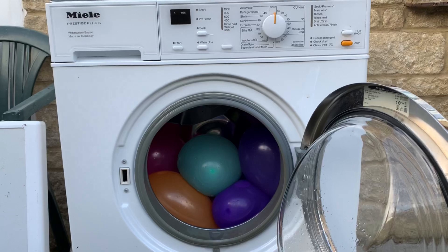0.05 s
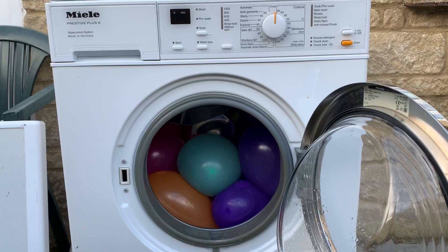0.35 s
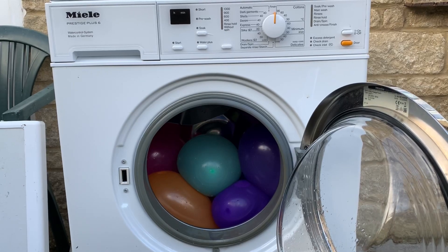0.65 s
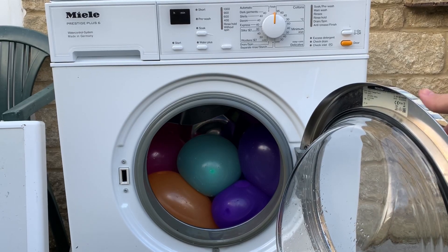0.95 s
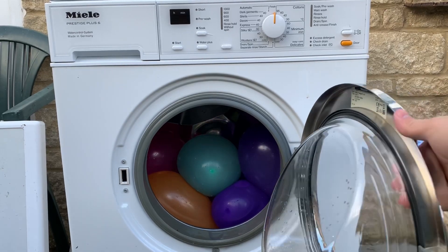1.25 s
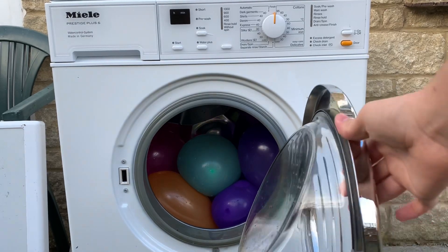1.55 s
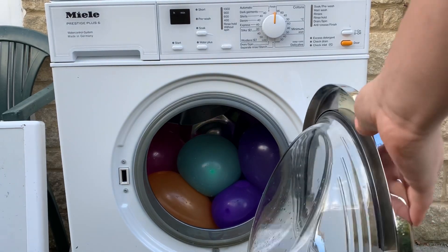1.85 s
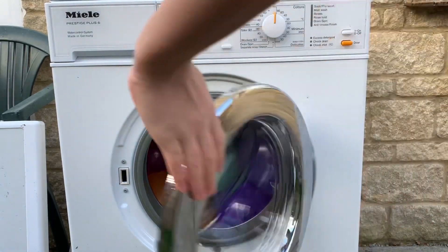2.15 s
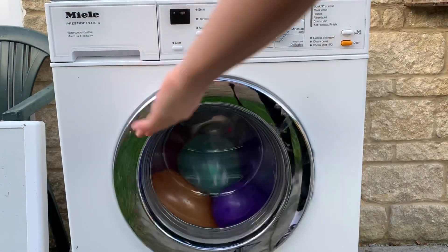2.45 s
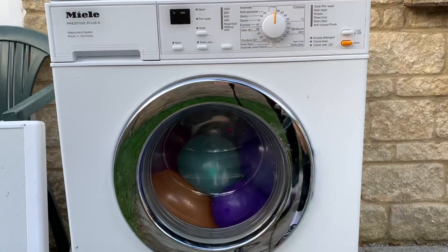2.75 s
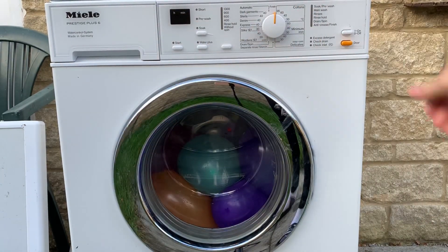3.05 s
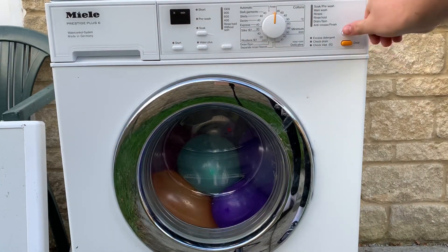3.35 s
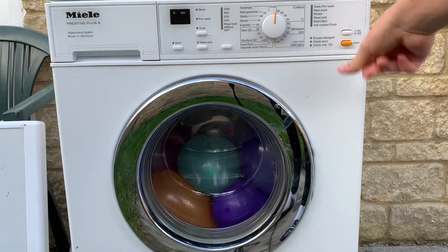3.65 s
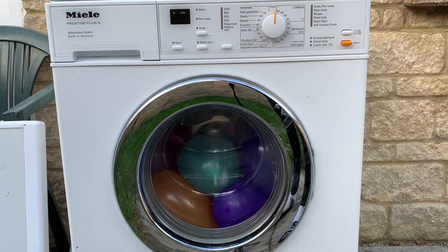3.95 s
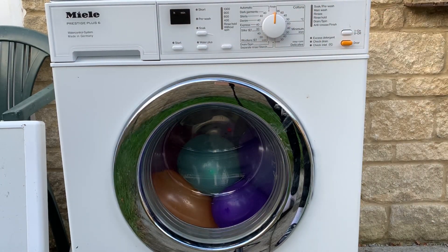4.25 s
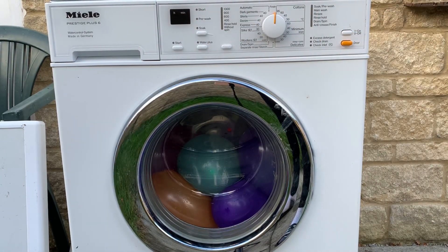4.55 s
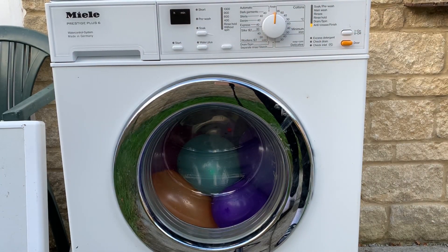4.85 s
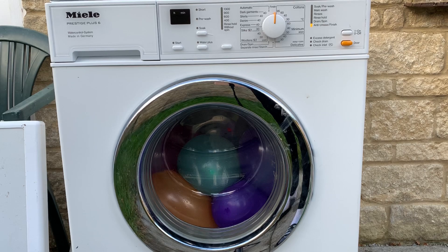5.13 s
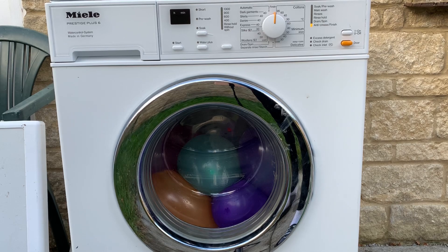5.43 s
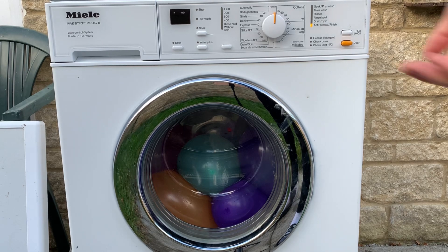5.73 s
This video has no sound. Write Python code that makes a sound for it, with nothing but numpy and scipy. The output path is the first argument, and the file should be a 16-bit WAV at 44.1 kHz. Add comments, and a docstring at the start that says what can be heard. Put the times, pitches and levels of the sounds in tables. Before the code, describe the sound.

Over a soft wind rumble, a washer's glass door bangs closed and latches, then a button clicks in and out.

```python
"""Washing machine door slammed in a yard.

The glass door swings and slams close by: it thumps into the seal, the latch snaps and rattles,
the steel cabinet rings and the tub booms on its springs. The lock ticks home, then a button
is pressed and released. Light wind, soft rustles and far traffic lie underneath."""
import sys
import numpy as np
from scipy import signal
from scipy.fft import rfft, irfft, next_fast_len
from scipy.io import wavfile
from scipy.ndimage import map_coordinates

SR = 44100
rng = np.random.default_rng(int(sys.argv[2]) if len(sys.argv) > 2 else 0)


def transcribe(u):
    """Save the signal u as a 16-bit wav file named by the first command-line argument.

    u: samples, shape (n,) or (channels, n), limited to [-1, 1]; the rate is SR.
    q: integer samples, one column per channel.
    """
    v = np.clip(np.atleast_2d(u).T, -1, 1)
    q = np.round(v * 32767).astype(np.int16)
    wavfile.write(sys.argv[1], SR, q)


N = 259749


def amp(db):
    """Decibels to gain."""
    return 10 ** (np.asarray(db) / 20)


def unit(x):
    """Scale to rms 1."""
    return x / np.sqrt(np.mean(x ** 2) + 1e-20)


def along(points, hz):
    """Interpolate (Hz, value) points on a log frequency axis."""
    knots_hz, values = np.transpose(points)
    return np.interp(np.log(hz + 1), np.log(knots_hz + 1), values)


def timeline(points):
    """Interpolate (seconds, value) points at every sample."""
    knots_s, values = np.transpose(points)
    return np.interp(np.arange(N) / SR, knots_s, values)


def wobble(rate_hz):
    """Smooth random curve, rate_hz knots a second."""
    knots = rng.standard_normal(int(N * rate_hz / SR) + 4)
    return map_coordinates(knots, [np.arange(N) * rate_hz / SR])


def fade(t, t60_s):
    """Decay of 60 dB in t60_s."""
    return np.exp(-np.log(1000) * t / t60_s)


def bell(centre_s, half_s):
    """Start time and gains of a Gaussian swell of height 1."""
    start_s = max(centre_s - 3 * half_s, 0)
    t = start_s + np.arange(round((centre_s + 3 * half_s - start_s) * SR)) / SR
    return start_s, np.exp(-((t - centre_s) / half_s) ** 2)


def filtered(x, response):
    """Apply a complex frequency response."""
    size = x.shape[-1]
    padded = next_fast_len(size + SR // 4)
    hz = np.fft.rfftfreq(padded, 1 / SR)
    return irfft(rfft(x, padded) * response(hz), padded)[..., :size]


def noise(spectrum, width, size=N):
    """Stereo noise of rms 1; spectrum and side-to-mid width are (Hz, dB) points."""
    def gains(hz):
        return amp(along(spectrum, hz)) * [np.ones_like(hz), amp(along(width, hz))]
    mid, side = filtered(rng.standard_normal((2, size)), gains)
    return unit(np.array([mid + side, mid - side]))


def dying(x, t60_points):
    """Decay each frequency at its own rate, from (Hz, t60 in seconds) points."""
    hz, t, bands = signal.stft(x, SR, nperseg=128)
    decay = fade(t, along(t60_points, hz)[:, None])
    return signal.istft(bands * decay, SR)[1][:, :x.shape[-1]]


def add(track, start_s, sound):
    """Mix a sound into the track."""
    start = round(start_s * SR)
    track[..., start:start + sound.shape[-1]] += sound[..., :N - start]


def swells(rows, relative_width):
    """Brief swells of noise, each in one narrow resonance."""
    out = np.zeros((2, N))
    for centre_s, half_s, hz, db in rows:
        start_s, swell = bell(centre_s, half_s)
        white = rng.standard_normal((2, SR))
        tone = unit(filtered(white, lambda f: 1 / (1 + ((f / hz - 1) / relative_width) ** 2)))
        add(out, start_s, amp(db) * swell[:SR] * tone[:, :len(swell)])
    return out


# Noise floor spectrum. Each row: frequency in Hz, relative density in dB.
FLOOR_SPECTRUM = [(30, 44.5), (60, 57), (100, 40.5), (170, 34), (250, 16), (2000, 3.5), (6000, -1),
                  (8300, 0), (10800, -1), (15500, -8)]


def noise_floor(level_db=-54):
    """The microphone's steady, low noise."""
    return amp(level_db) * noise(FLOOR_SPECTRUM, [(60, -13.5), (1000, 0)])


# Stereo width of the open air. Each row: frequency in Hz, side against mid in dB.
AIR_STEREO = [(60, -5), (110, -8.5), (200, -7), (380, -2), (700, 2), (1290, 2), (2380, -0.5), (4400, -0.5),
              (8120, 0), (15000, -5)]
# Traffic loudness. Each row: time in seconds, relative level in dB.
TRAFFIC_LEVELS = [(0.0, -53.5), (0.74, -53.5), (1.26, -57), (2.03, -57), (2.38, -49), (2.9, -56.5),
                  (5.89, -57)]
# Far traffic spectrum. Each row: frequency in Hz, relative density in dB.
TRAFFIC_SPECTRUM = [(59, -30.5), (100, -1.5), (185, -7), (203, -8.5), (230, -8), (252, -11), (286, -7),
                    (377, -14), (427, -15), (483, -16), (590, -17), (982, -18), (1400, -23), (1750, -32),
                    (2230, -39), (4000, -45.5), (5200, -70), (8800, -120)]


def traffic(gain_db=2, waver_db=0.5):
    """Traffic hums far away."""
    level_db = timeline(TRAFFIC_LEVELS) + gain_db + waver_db * wobble(6.1)
    return amp(level_db) * noise(TRAFFIC_SPECTRUM, AIR_STEREO)


# Distant chirps. Each row: centre in seconds, half length in seconds, pitch in Hz, level in dB.
FAR_CHIRPS = [(0.14, 0.036, 5340, -71.5), (1.1, 0.085, 6580, -76), (5.84, 0.046, 6590, -76)]


def chirps():
    """Faint, thin chirps from far off."""
    return swells(FAR_CHIRPS, relative_width=0.024)


# Wind strength. Each row: time in seconds, relative level in dB.
WIND_LEVELS = [(0, -46), (.45, -43), (.62, -38), (.85, -37.5), (1.15, -34), (1.38, -36), (1.52, -41.5),
               (1.7, -43.5), (1.9, -49.5), (2.15, -41.5), (2.7, -45.5), (3.05, -49), (3.7, -48),
               (4.3, -52.5), (5.89, -52)]
# Buffeting spectrum. Each row: frequency in Hz, relative density in dB.
WIND_SPECTRUM = [(12, -46), (20, -22), (47, 1), (74, -1), (120, -5), (232, -23), (258, -28), (296, -22.5),
                 (431, -46), (500, -46.5), (650, -70.5), (1100, -120)]


def wind(gain_db=-1, gust_db=2):
    """Wind buffets the microphone with an uneven rumble."""
    level_db = timeline(WIND_LEVELS) + gain_db + gust_db * wobble(14)
    return amp(level_db) * noise(WIND_SPECTRUM, [(60, -10.5), (300, -13)])


# Puffs of wind. Each row: centre in seconds, half length in seconds, pitch in Hz, level in dB.
EDDIES = [(0.273, 0.017, 79, -33), (0.525, 0.021, 75.1, -32.5), (0.627, 0.016, 95, -29),
          (0.705, 0.055, 75, -32.5), (0.958, 0.024, 75, -30), (1.022, .025, 80, -32.5),
          (1.128, 0.016, 78.43, -26.5), (1.303, 0.018, 130.2, -32.5), (1.445, 0.029, 70.3, -29.5),
          (1.628, 0.011, 64.9, -36.5), (2.952, 0.024, 60, -33.5)]


def puffs(waver=0.12, octave_db=-14):
    """Each eddy shakes the microphone for a few uneven, low cycles, with a weaker octave above."""
    out = np.zeros(N)
    clock_s = np.cumsum(1 + waver * wobble(60)) / SR
    for centre_s, half_s, hz, db in EDDIES:
        start_s, swell = bell(centre_s, half_s)
        phase = 2 * np.pi * hz * clock_s[round(start_s * SR):][:len(swell)]
        shake = np.sin(phase) + amp(octave_db) * np.sin(2 * phase)
        add(out, start_s, np.sqrt(2) * amp(db) * swell * shake)
    return out


# Scuffs. Each row: centre in seconds, half length in seconds, rub in dB, relative hiss in dB.
RUSTLE_STROKES = [(0.157, 0.27, -67.5, -79.5), (0.326, 0.087, -73, -74), (.63, 0.17, -67, -101),
                  (.83, 0.065, -60, -68), (0.918, 0.062, -63.5, -77.5), (1.116, 0.11, -63.5, -77.5),
                  (1.408, 0.084, -68.5, -73.5), (1.48, 0.017, -65, -58), (1.587, 0.12, -67, -65.5),
                  (1.792, 0.018, -67, -66), (1.838, 0.06, -65, -77), (2.07, 0.065, -60, -79),
                  (2.154, 0.042, -52.5, -63.5), (2.215, 0.078, -59, -62), (2.566, 0.028, -75, -73),
                  (2.81, 0.15, -73.5, -76), (4.156, 0.047, -75, -74.5), (4.52, 0.21, -76.5, -79.5),
                  (4.812, 0.09, -68, -74), (5.086, 0.2, -71, -77.5), (5.502, .1, -72.5, -81),
                  (5.841, 0.052, -73, -83.5)]
# Rub and hiss spectra. Each row: frequency in Hz, relative density in dB.
RUB_SPECTRUM = [(900, -24.5), (1700, 2.5), (2800, -0.5), (4200, -5), (6500, -23.5)]
HISS_SPECTRUM = [(2500, -20), (4200, 3), (6200, 2.5), (8200, -3.5), (10800, -6.5), (13000, -11),
                 (15500, -12)]


def rustles(hiss_gain_db=3, grain_db=1.37):
    """Soft strokes of dull rub and bright hiss, loudest as the arm swings the door."""
    rub_power, hiss_power = np.zeros((2, N))
    for centre_s, half_s, rub_db, hiss_db in RUSTLE_STROKES:
        start_s, stroke = bell(centre_s, half_s)
        add(rub_power, start_s, (amp(rub_db) * stroke) ** 2)
        add(hiss_power, start_s, (amp(hiss_db + hiss_gain_db) * stroke) ** 2)
    grain = amp(grain_db * wobble(45))
    rub = np.sqrt(rub_power) * noise(RUB_SPECTRUM, AIR_STEREO)
    hiss = np.sqrt(hiss_power) * noise(HISS_SPECTRUM, AIR_STEREO)
    return grain * (rub + hiss)


# Yard reverberation. Each row: frequency in Hz, t60 in seconds.
YARD_DECAY = [(100, .6), (500, 0.29), (2000, 0.37), (6000, 0.18), (9000, 0.24), (15000, 0.11)]


def yard(x, wet_db=-17, build_s=0.0073):
    """Stone walls return a thin, diffuse tail."""
    t = np.arange(SR * 2 // 3) / SR
    tail = dying(rng.standard_normal((2, len(t))), YARD_DECAY) * (1 - np.exp(-t / build_s)) ** 2
    tail /= np.linalg.norm(tail[0])
    return amp(wet_db) * signal.fftconvolve(x, tail, axes=1)[:, :N]


def paving_bounce(x, delay_s=0.0027, share=0.077):
    """A quick reflection from the paving adds a hollow colour."""
    return filtered(x, lambda hz: 1 + share * np.exp(-2j * np.pi * hz * delay_s)) / np.hypot(1, share)


# Hinge creaks. Each row: centre in seconds, half length in seconds, pitch in Hz, level in dB.
HINGE_CREAKS = [(1.1, 0.063, 1650, -61.5), (2.066, .05, 2852, -64)]


def hinge():
    """The hinge rubs as the door swings."""
    return swells(HINGE_CREAKS, relative_width=0.05)


# Stereo width of the machine. Each row: frequency in Hz, side against mid in dB.
MACHINE_STEREO = [(60, -16), (110, -14), (200, -12), (380, -6), (700, -7), (1290, -7), (2380, -3),
                  (4400, 0), (8120, 0), (15000, -1)]


def modes(rows, t):
    """Decaying (Hz, dB, t60 in seconds) modes; higher ones reach left and right further out of step."""
    out = np.zeros((2, len(t)))
    for hz, db, t60_s in rows:
        lead = rng.choice([-1, 1]) * np.arctan(amp(along(MACHINE_STEREO, hz)))
        phase = rng.uniform(0, 2 * np.pi) + np.array([[lead], [-lead]])
        out += amp(db) * np.sin(2 * np.pi * hz * t + phase) * fade(t, t60_s)
    return out


# Small contacts. Each row: start in seconds, level in dB, then relative body, snap and ring in dB.
SMALL_TICKS = [(1.473, -52, 1, -25, -7), (2.7128, -35.5, 1.5, -28, -24), (2.7151, -45, -3, -22, -19),
               (2.7346, -56, 0, -23, -13), (3.3168, -58, 2, -32, -2.5), (3.9543, -57.5, -6, -5.5, -17),
               (5.1958, -50.5, -13, -20, -18)]


def ticks(tick_t60_s=0.0093, ring_t60_s=0.42):
    """Lock and fingertip make small, dry ticks, pitched near 2 kHz."""
    out = np.zeros((2, N))
    t = np.arange(SR // 4) / SR
    for start_s, db, body_db, snap_db, ring_db in SMALL_TICKS:
        colour = [(500, -16), (1200, -15), (1650, body_db), (2800, body_db - 10), (3400, -18),
                  (5800, -16), (10000, snap_db), (15500, snap_db + 0.5)]
        envelope = fade(t, tick_t60_s) + amp(ring_db) * fade(t, ring_t60_s)
        add(out, start_s, amp(db) * noise(colour, MACHINE_STEREO, len(t)) * envelope)
    return out


# Plastic fascia resonances. Each row: frequency in Hz, bandwidth in Hz, relative level in dB.
FASCIA_MODES = [(570, 25, -6), (1498, 48, -2.5), (1644, 60, -2.5), (2294, 50, -3), (4680, 60, -20),
                (6100, 39, -19), (6570, 87, -9), (11100, 38, -25)]
# Button pushed, bottoming, released.
# Each row: start in seconds, then relative level, body, snap, top treble and ring in dB.
BUTTON_CLICKS = [(3.3341, -39, -6, -8, -34, -13), (3.3445, -40, 8, -34, -45, -4.5),
                 (3.3523, -39.5, 1.5, -35, -45, -6), (3.525, -29.5, -4.5, -9.5, -5.5, -6.5)]


def button(gain_db=-4, tick_t60_s=0.01, ring_t60_s=0.112, plastic_db=-6):
    """The button's spring snaps; the plastic fascia and the hollow behind it ring briefly."""
    out = np.zeros((2, N))
    t = np.arange(SR // 4) / SR
    fascia = [(hz, db, np.log(1000) / (np.pi * width_hz)) for hz, width_hz, db in FASCIA_MODES]
    hollow_decay = [(500, 2.5 * ring_t60_s), (2500, ring_t60_s), (6000, 0.725 * ring_t60_s)]
    for start_s, db, body_db, snap_db, top_db, ring_db in BUTTON_CLICKS:
        colour = [(140, body_db - 6), (300, body_db), (600, body_db + 6), (1100, body_db + 4),
                  (1500, -2.5), (2200, -1), (3200, -8), (4200, -7.5), (6000, -23.5),
                  (10500, snap_db), (15500, top_db)]
        tick = noise(colour, MACHINE_STEREO, len(t)) * fade(t, tick_t60_s)
        hollow = amp(ring_db) * dying(noise(colour, MACHINE_STEREO, len(t)), hollow_decay)
        plastic = amp(plastic_db) * modes(fascia, t)
        add(out, start_s, amp(db + gain_db) * (tick + hollow + plastic))
    return out


# Steel cabinet and glass bowl. Each row: frequency in Hz, relative level in dB, t60 in seconds.
CABINET_MODES = [(184.4, -13, 2.1), (302, -14.5, 0.53), (349.7, -3, 0.31), (540, -18, 0.41),
                 (658, -18, 1.3), (710, -10.5, 0.26), (750, -12, 0.32), (753, -10.5, 0.67),
                 (931, -13.5, 0.3), (1021, 2.5, 0.18), (1080, -12, 0.21), (1190, -15.5, 0.4),
                 (1400, -11, 0.22), (1425, -13, 0.45), (1620, -22.5, 0.4), (1710, -13, 0.2),
                 (2020, -34, 0.49), (2153, -8.5, 0.35), (2320, -26, 0.33), (2200, -13.5, 0.22),
                 (2492, -16.5, 0.27), (3130, -12, 0.18)]
# Steel latch and trim ring. Each row: frequency in Hz, relative level in dB, free t60 in seconds.
LATCH_MODES = [(3700, -10, 0.57), (3800, 0.5, 0.35), (4708, -7, 0.5), (6026, 0.5, 0.28), (6708, -15, 0.51),
               (9356, -3, 0.15), (9600, -5, 0.44), (10300, -5, 0.46), (11000, -10.5, 0.34),
               (12770, -10.5, 0.12)]


def cabinet(start_s=2.245, steel_db=-28, latch_db=-32, attack_s=0.004, catch_t60_s=0.25):
    """Sheet steel rings on after the blow; the closed catch damps latch and trim ring."""
    out = np.zeros((2, N))
    t = np.arange(SR) / SR
    steel = amp(steel_db) * modes(CABINET_MODES, t)
    latch = amp(latch_db) * modes(LATCH_MODES, t) * fade(t, catch_t60_s)
    add(out, start_s, (steel + latch) * (1 - np.exp(-t / attack_s)))
    return out


def rocking(fall_db_per_s, start_s=2.245, attack_s=0.01, hold_s=0.23,
            sway_hz=14.2, sway_depth=0.39, sway_origin_s=2):
    """Attack, hold and release of the tub's motion, swaying on its springs."""
    t = np.arange(N) / SR
    age_s = t - start_s
    attack = np.clip(age_s / attack_s, 0, 1)
    release = amp(-fall_db_per_s * np.maximum(age_s - hold_s, 0))
    sway = 1 + sway_depth * np.cos(2 * np.pi * sway_hz * (t - sway_origin_s))
    return attack * release * sway


# Low modes of the sprung tub. Each row: frequency in Hz, relative level in dB.
BOOM_MODES = [(108.5, 0), (132, -12.5), (185, -18.5), (290, -20)]
# Tub shudder spectrum. Each row: frequency in Hz, relative density in dB.
SHUDDER_SPECTRUM = [(40, -21.5), (70, 3.5), (130, 3), (160, -7), (200, -4.5), (300, -7.5), (450, -11),
                    (550, -18.5), (1000, -22), (2000, -38.5), (5000, -37), (12000, -59.5)]


def tub(boom_db=-28, shudder_db=-36.5, waver=0.012, uneven_db=1.4, ring_db=8, half_width_hz=9):
    """The tub booms unevenly and shakes the cabinet's resonances as it rocks to rest."""
    def steel(f):
        peaks = sum(1 / (1 + ((f - hz) / half_width_hz) ** 2) for hz, _, _ in CABINET_MODES)
        return 1 + amp(ring_db) * peaks
    boom = np.zeros(N)
    for hz, db in BOOM_MODES:
        phase = 2 * np.pi * hz * np.cumsum(1 + waver * wobble(18)) / SR
        boom += np.sqrt(2) * amp(db + uneven_db * wobble(28)) * np.sin(phase)
    shudder = unit(filtered(noise(SHUDDER_SPECTRUM, MACHINE_STEREO), steel))
    return (amp(boom_db) * rocking(fall_db_per_s=60) * boom
            + amp(shudder_db) * rocking(fall_db_per_s=88) * shudder)


# Door and front panel modes. Each row: frequency in Hz, relative level in dB.
PANEL_MODES = [(64, -3.5), (93, -0.5), (119, 1.5), (199, -3), (236, -5.5), (289, -2.5), (361, -10.5),
               (423, -11), (455, -16), (507, -5), (544, -9.5), (581, -15.5), (655, -7.5), (709, -6),
               (744, -9.5), (793, -10.5), (848, -16.5), (933, -13), (1012, -13), (1073, -22), (1112, -13),
               (1297, -26.5), (1417, -20.5), (1515, -19), (1702, -26.5), (1853, -17.5), (1951, -19.5),
               (2164, -16.5), (2365, -18), (2688, -14)]


def panel(start_s=2.2413, low_t60_s=0.13, damping=0.066, attack_s=0.00026):
    """The main blow sets door and front panel ringing; the seal damps high modes first."""
    out = np.zeros((2, N))
    t = np.arange(SR // 2) / SR
    hz, db = np.transpose(PANEL_MODES)
    t60_s = low_t60_s * (hz / hz[0]) ** -damping
    # A panel this size radiates its middle modes best.
    radiation_db = along([(110, -12), (220, -9), (500, -8), (850, -8), (1300, -12)], hz)
    ring = modes(zip(hz, db + radiation_db, t60_s), t)
    add(out, start_s, ring * (1 - np.exp(-t / attack_s)))
    return out


def rattles(count=4, start_s=2.277, gap_s=0.0122, rise_s=0.0016,
            thump_db=-30, clatter_db=-23, crack_db=-24, loss_db=1.5):
    """Contact rows for the door's evenly spaced bounces on its catch, each weaker."""
    levels_db = np.array([thump_db, clatter_db, crack_db])
    return [(start_s + k * gap_s, *(levels_db - k * loss_db), rise_s) for k in range(count)]


# The door meets seal, rim and latch, then settles with a soft knock.
# Each row: start in seconds, thump, clatter and crack in dB, rise in seconds.
DOOR_CONTACTS = [(2.225, -40, -30, -48, .0027), (2.234, -41, -22, -33, .0015),
                 (2.2403, -21.5, -13, -21.5, .0005), (2.2469, -19.5, -15.5, -16, .0004),
                 (2.2498, -23.5, -25, -15, .0003), (2.256, -20.5, -19, -27.5, .0008),
                 (2.2633, -22.5, -23.5, -23.5, .0015), (2.488, -36, -46.5, -71, 0.0085)]
# Clatter and latch crack spectra. Each row: frequency in Hz, relative density in dB.
CLATTER_SPECTRUM = [(30, -14.5), (55, -6), (110, -8), (165, -13), (220, -3.5), (400, -6.5), (750, -7.5),
                    (1050, -7.5), (1300, -15.5), (2200, -12.5), (3000, -22), (6000, -42.5)]
CRACK_SPECTRUM = [(400, -24), (1200, -7.5), (2200, 1.5), (3300, 6), (6000, 4), (9000, 6.5), (12500, 2),
                  (15500, 0)]
# Clatter decay. Each row: frequency in Hz, t60 in seconds.
CLATTER_DECAY = [(60, 0.38), (200, 0.21), (700, 0.094), (2500, 0.1), (10000, 0.033)]


def door(seal_hz=125, seal_t60_s=0.055, crack_t60_s=0.09, grain_db=1.5, grain_hz=500):
    """Each contact thumps the rubber seal, shakes the door's loose parts and cracks at the latch."""
    out = np.zeros((2, N))
    t = np.arange(SR // 3) / SR
    thump = np.sin(2 * np.pi * seal_hz * t) * fade(t, seal_t60_s)
    chatter = unit(amp(grain_db * wobble(grain_hz)))  # tiny impacts of loose latch parts
    for start_s, thump_db, clatter_db, crack_db, rise_s in DOOR_CONTACTS + rattles():
        clatter = dying(noise(CLATTER_SPECTRUM, MACHINE_STEREO, len(t)), CLATTER_DECAY)
        crack = noise(CRACK_SPECTRUM, MACHINE_STEREO, len(t)) * fade(t, crack_t60_s)
        crack *= chatter[round(start_s * SR):][:len(t)]
        contact = amp(thump_db) * thump + amp(clatter_db) * clatter + amp(crack_db) * crack
        add(out, start_s, contact * (1 - np.exp(-t / rise_s)))
    return out


def scene(left_minus_right_db=-0.5):
    """The machine, its yard and the open air."""
    machine = hinge() + paving_bounce(door() + ticks() + button()) + panel() + cabinet()
    balance = amp([[left_minus_right_db / 2], [-left_minus_right_db / 2]])
    air = (wind() + traffic() + rustles()) * balance + puffs() + chirps() + noise_floor()
    return machine + yard(machine) + tub() + air


def microphone_ports(x, from_hz=7450, opposed_hz=8650, spacing_hz=4720):
    """Up through the treble, the two ports hear opposite, alike and opposite again."""
    def gains(hz):
        alike = -np.cos(2 * np.pi * (hz - opposed_hz) / spacing_hz) * (hz > from_hz)
        return np.sqrt([1 + alike, 1 - alike])
    mid, side = filtered(np.array([x[0] + x[1], x[0] - x[1]]) / 2, gains)
    return np.array([mid + side, mid - side])


def record(dry, opening_s=(0.034, 0.042), ceiling=0.92, top_hz=15850):
    """The microphone opens, rounds off the highest peaks and cuts everything above its band limit."""
    opened = microphone_ports(dry) * np.interp(np.arange(N) / SR, opening_s, [0, 1])
    rounded = opened / (1 + np.abs(opened / ceiling) ** 6) ** (1 / 6)
    return filtered(rounded, lambda hz: 1 / (1 + (hz / top_hz) ** 200))


dry = scene()
out = record(dry)
transcribe(out)
```